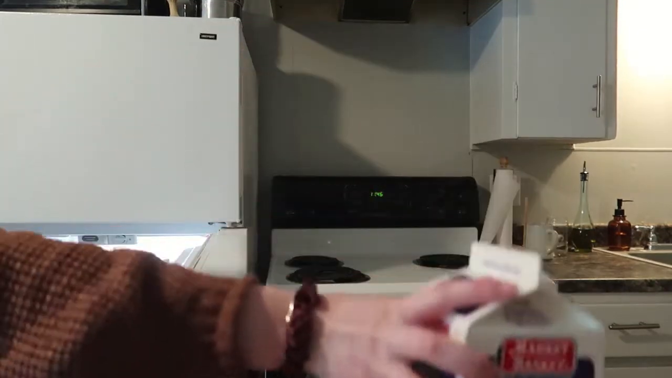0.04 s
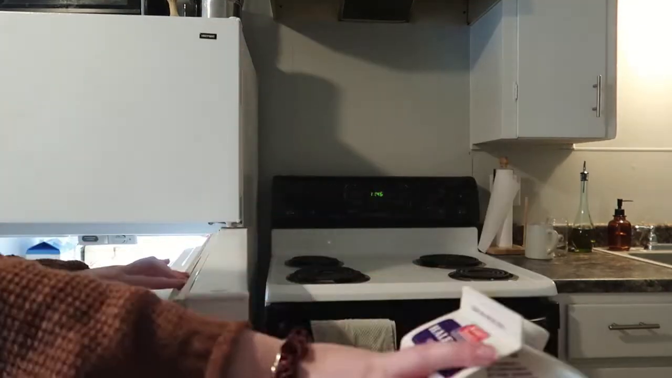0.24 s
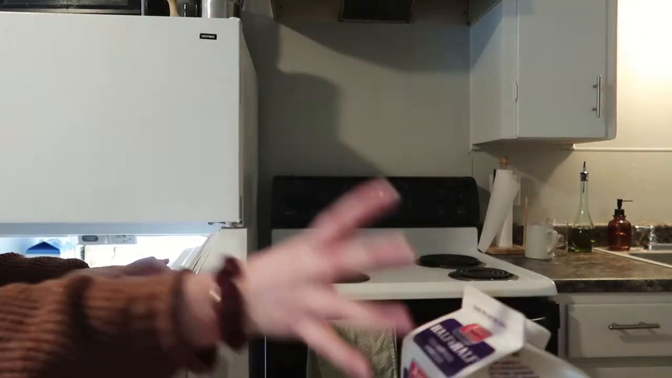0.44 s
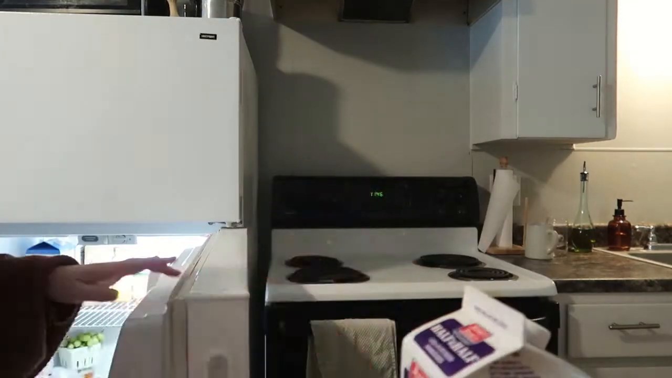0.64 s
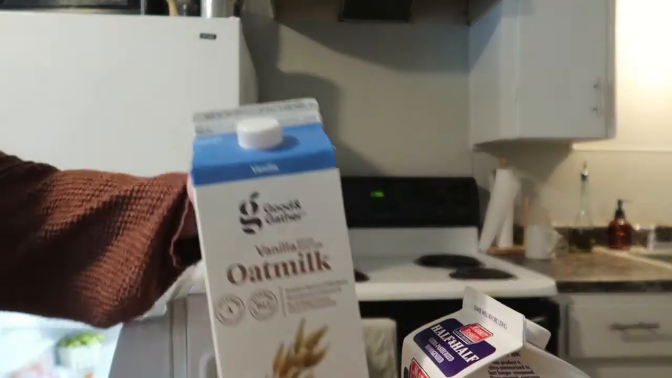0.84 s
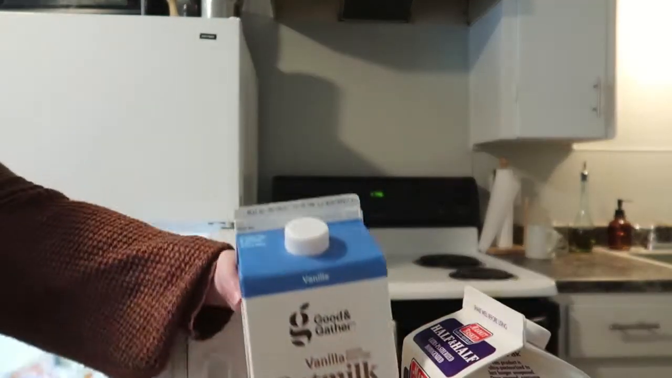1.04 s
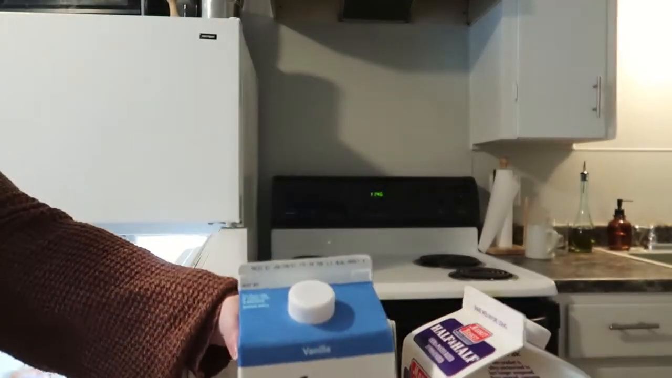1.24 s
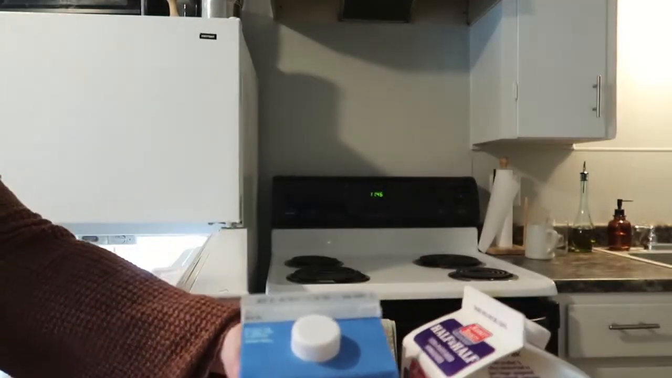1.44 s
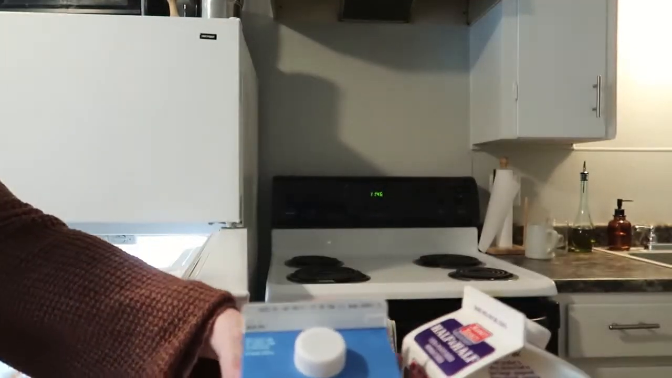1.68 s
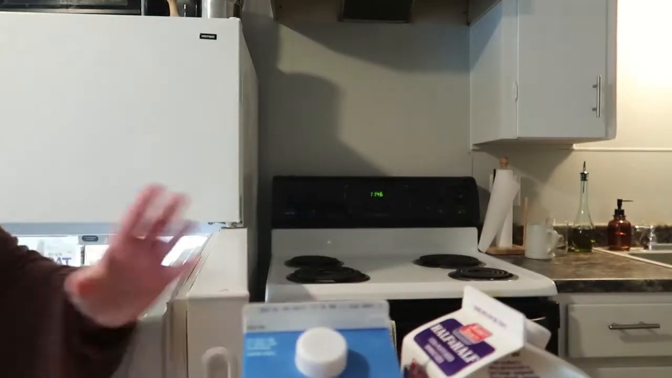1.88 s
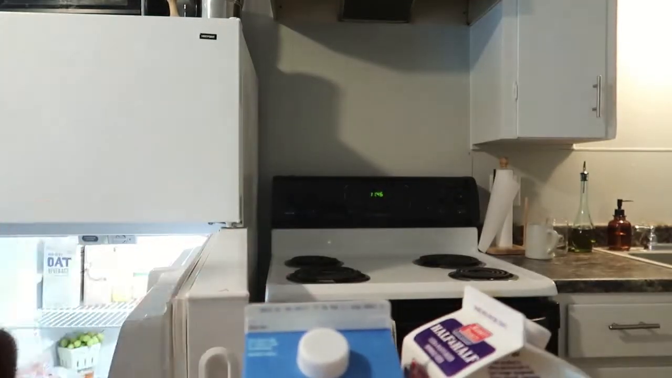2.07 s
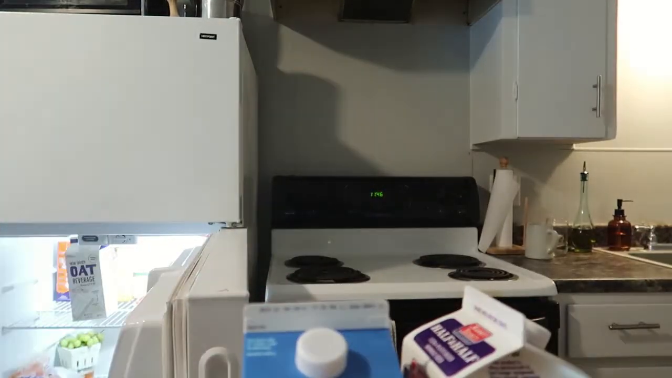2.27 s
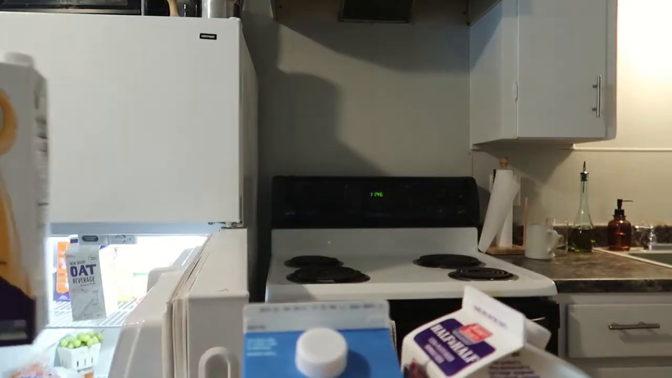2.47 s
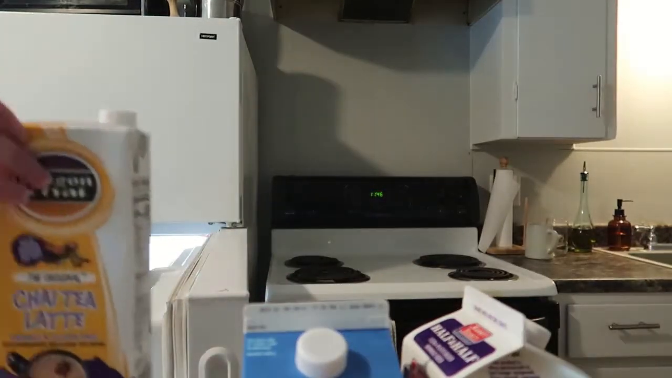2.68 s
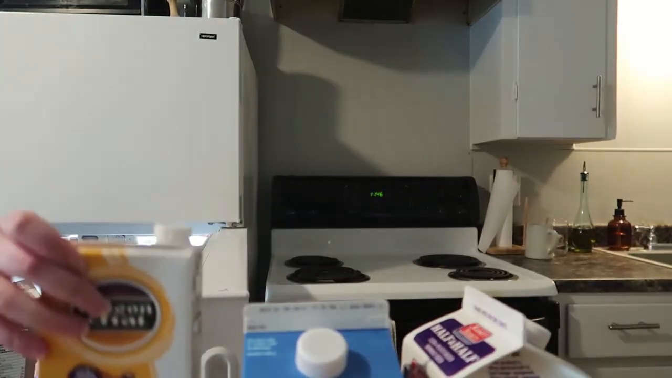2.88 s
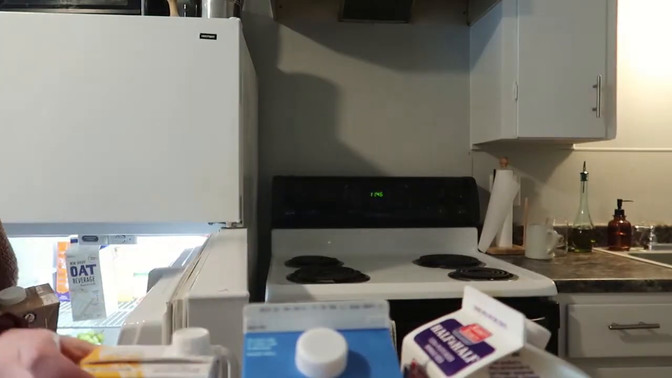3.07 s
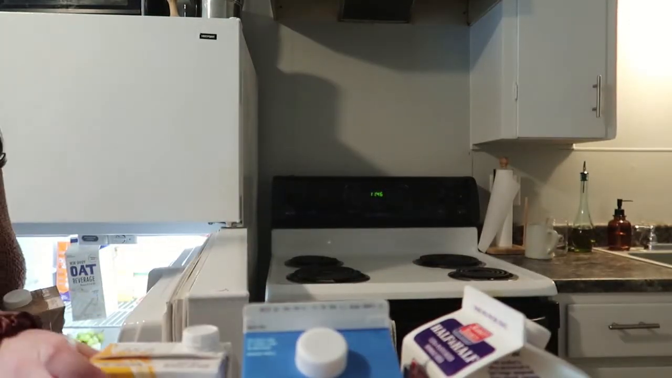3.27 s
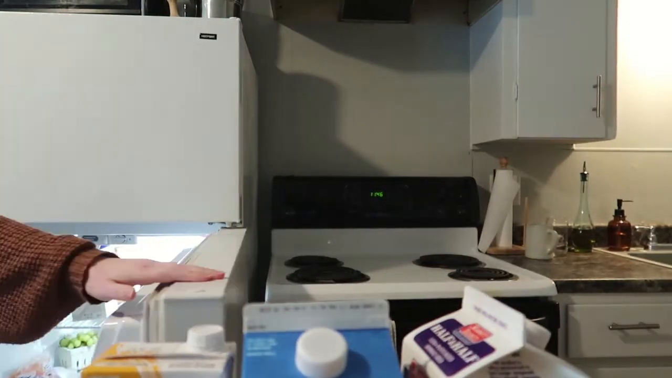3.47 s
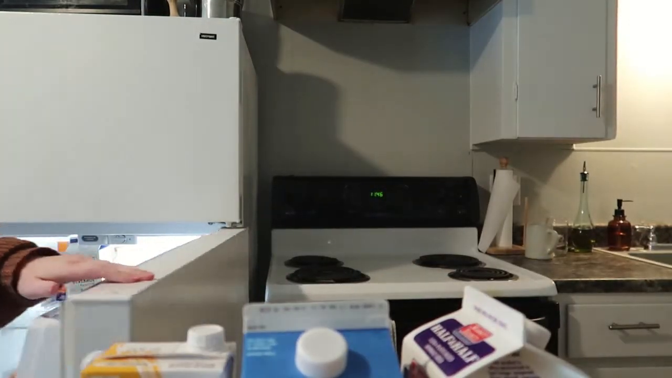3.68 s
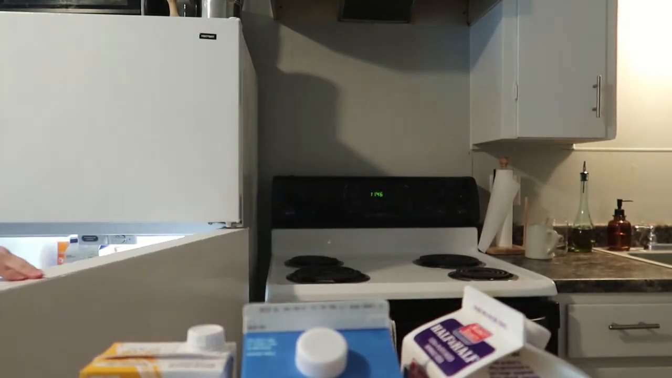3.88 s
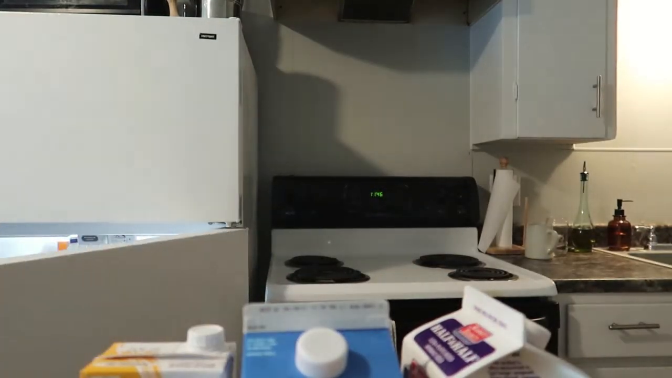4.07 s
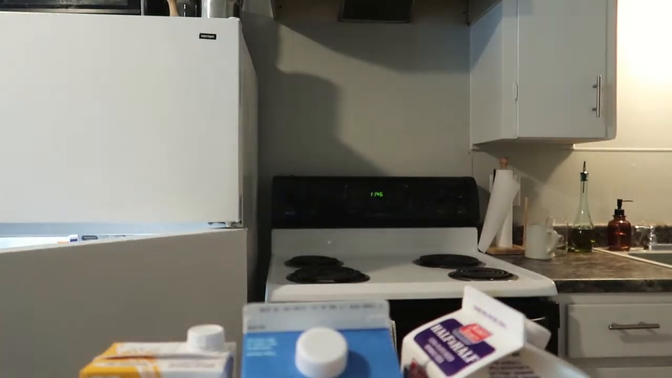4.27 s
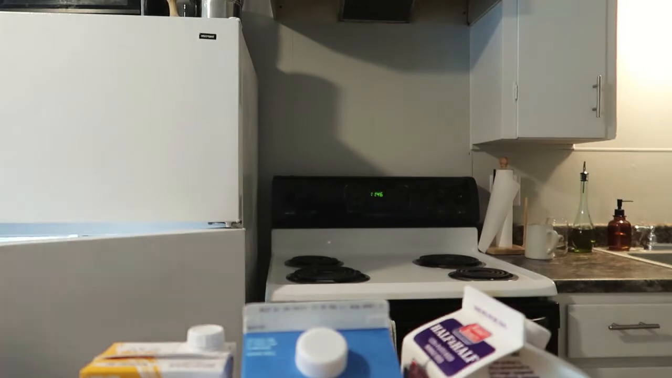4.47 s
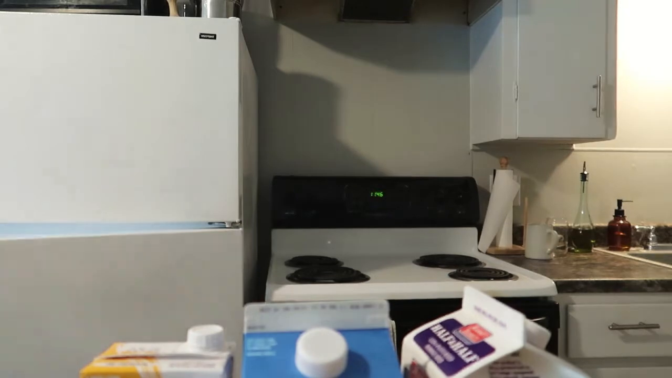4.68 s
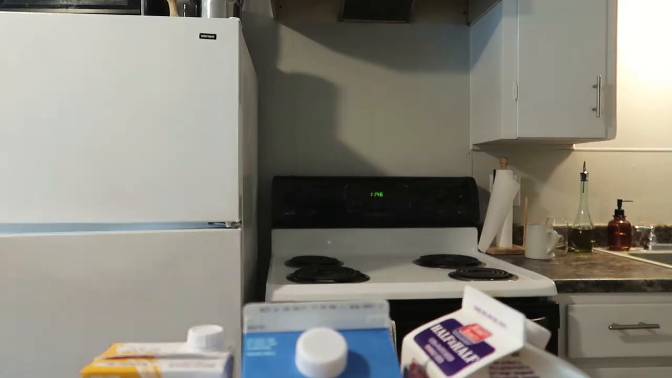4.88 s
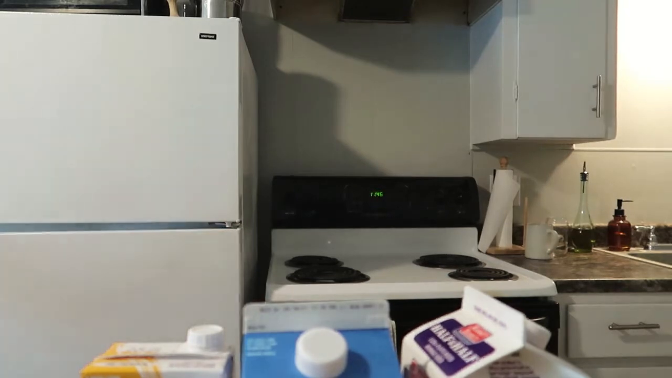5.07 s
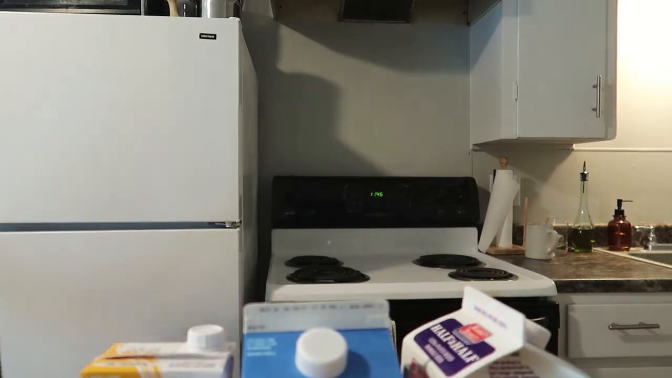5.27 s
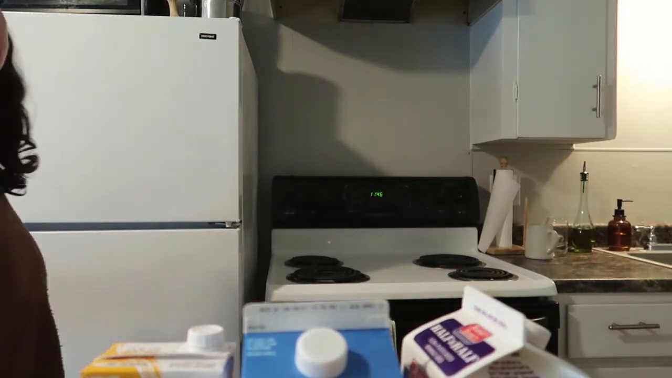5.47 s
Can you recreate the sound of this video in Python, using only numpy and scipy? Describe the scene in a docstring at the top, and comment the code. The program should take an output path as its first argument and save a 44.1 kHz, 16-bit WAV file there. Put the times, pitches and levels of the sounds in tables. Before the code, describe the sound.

A small, slightly reverberant kitchen, heard close to the counter in stereo, with soft low room tone and hiss. At 0.2 s a full carton lands very loudly, a rapid cluster of dull thuds and slaps ringing the counter briefly; the limiter ducks the background, which recovers over more than a second. At 0.4-0.55 s come small knocks, a tiny squeak and papery rubbing, then faint liquid gulps and clicks at 0.6-0.9 s. A second carton bumps down at 1.45 s, rocking and settling, with light taps and a slide at 1.7-1.9 s. It is quiet from 2 s, with a faint deep drone. At 3.16 s a third carton hits harder and brighter, settling by 3.3 s. From 3.5 s the fridge door is pushed with soft scrapes and rattles, low thumps near 3.95 and 4.5 s, and a faint raspy creak. Light knocks at 5.2-5.45 s end it.

```python
"""Three full paper cartons land on a kitchen counter: damped sines give thud and slab ring, filtered noise the slap.
Light taps and clicks ring thin walls by modal sums; sliding board is grainy friction noise; squeaks are sines in hiss.
Liquid gulps through a drifting resonance, and the refrigerator door knocks and rattles as it is pushed and shut.
Low sines make the thumps, drone and compressor hum, over room tone and hiss in a small reverberant kitchen.
The first thud drives the recorder's limiter down for over a second."""
import sys
import numpy as np
from scipy import signal
from scipy.fft import rfft, irfft, next_fast_len
from scipy.io import wavfile
from scipy.ndimage import uniform_filter1d, minimum_filter1d

SR = 44100
rng = np.random.default_rng(int(sys.argv[2]) if len(sys.argv) > 2 else 0)


def persist_wave(psi):
    """Save psi, clipped to +-1, as 16-bit WAV."""
    counts = np.round(np.clip(psi, -1, 1) * 32767).astype(np.int16)
    wavfile.write(sys.argv[1], SR, np.atleast_2d(counts).T)


N = 243873

# a carton lands and rocks, or is tapped with a low thud; hardness runs from flat base 0 to sharp edge 1,
# ring and slap are against the force:
# start_s, force_db, thud_hz, ring_db, hardness_0_to_1, slab_place_0_to_1, slap_db
CARTON_BLOWS = [(.1944, 9, 275.6, -16.5, 0.45, 0.12, -8.5), (0.1982, 7, 225, -17, 0.15, .28, -21.5),
                (0.2022, -1.5, 429, -17.5, 0.05, .36, -20), (.2098, -10.5, 410, -12, .1, 0.1, -7),
                (.2247, -1.5, 356, -3, 0.01, .47, -24), (0.2398, -4, 399, -9, 0.62, 0.31, -10.5),
                (0.2521, -1.5, 314, -8, 0, 0.44, -19), (0.2594, -4.5, 181, -22, 0, 0.27, -25),
                (.279, -9, 251, -21, 0, .1, -24), (0.4011, -22, 476, -3, 0.79, .75, -11),
                (.49, -22.5, 320, -10.5, 0.015, 0.36, -20), (.502, -23.5, 253, 1.5, 0.73, 0.48, -11),
                (.513, -19, 354, -1, 0.32, 0.04, -25), (.545, -15, 174, -18, 0, 0.72, -27),
                (1.157, -23, 205, -2, 0.17, 0.44, -27), (1.172, -36.5, 183, 13.5, 0, 0.2, -23),
                (1.4538, -16, 420, -11, 0.53, 0.38, -5.5), (1.4593, -7, 445, -6, 0.53, .14, -12),
                (1.4693, -7.5, 191, 0, 0, .5, -21), (1.479, -15, 210, -6, 0.25, 0.35, -19),
                (1.485, -21.5, 608, -5, 0, .5, -12), (1.504, -25, 430, -11, .55, 0.19, -9),
                (1.5108, -11, 212, -17.5, 0, .26, -22), (1.5201, -17, 254, -15, 0.019, 0.61, -19),
                (1.5619, -23.5, 217, -7, 0.35, 0.61, -28), (1.799, -26, 256, -7, 0.019, .3, -15),
                (3.159, -14.5, 341, -9.5, 0.92, .43, -5.5), (3.1616, -0.5, 293, -20.5, 0.95, 0.02, -8.5),
                (3.168, -18, 435, -10, .95, 0.51, -3), (3.183, -20.5, 636, -3.5, 0.91, 0.73, -11),
                (3.193, -22, 385, -3, 0.13, 0.2, -15), (3.229, -22.5, 288, 3.5, 0.88, .5, 2),
                (3.235, -12, 313, -2, 1, 0.25, -12.5), (3.2403, -20.5, 641, -3.5, 0.59, .6, -20),
                (3.291, -35, 254, -7, 0.2, 0.28, -12)]
# modes of the counter slab and what stands on it: mode_hz, level_db, t60_s
COUNTER_MODES = [(100.5, -17.5, 0.28), (139.4, -17.5, 0.63), (149.8, -11.5, 0.22), (197.4, 0, 0.18),
                 (229.2, -8, 0.2), (266.7, -1, 0.14), (312, -16, 0.13), (339.4, -15, 0.29),
                 (396.7, 2.5, 0.22), (435, -10.5, 0.056), (464.6, -11.5, 0.33), (513, -5, 0.29),
                 (617, -14.5, 0.34), (631, -8.5, 0.082), (721, -10, 0.16), (872, -5, 0.098)]
# slap spectrum of a gable-top carton: frequency_hz, level_db
GABLE_SLAP = [(150, 0), (500, 7.5), (680, 3), (860, 6.5), (1020, -7.5), (1170, -7.5), (1350, 3), (1750, -8),
              (2150, -3), (2450, -0.5), (2900, -8.5), (3500, -5), (4900, -7.5), (8000, -11), (15000, -18)]
# slap spectrum of the last, brick-shaped carton: frequency_hz, level_db
BRICK_SLAP_SPECTRUM = [(150, 1.5), (450, 4), (720, 5), (880, -6), (1150, -10.5), (1350, 3), (1900, 0),
                       (2170, 2.5), (2750, -7.5), (3200, -9.5), (3600, -16), (4350, -5.5), (5100, -11),
                       (5800, -6), (8500, -10), (15000, -10)]
# light taps and clicks on thin walls (carton, shelf or refrigerator door):
# start_s, level_db, pitch_factor, cutoff_hz, wall_place_0_to_1
LIGHT_TAPS = [(.402, -20.5, 0.97, 2400, 0.87), (0.4544, -23, 0.99, 2780, 0.58),
              (0.7229, -35, 1.13, 9000, 0.84), (.7995, -32, 0.86, 3050, 0.98), (1.6912, -25, 1, 3406, 0.56),
              (1.7156, -32, 1.04, 2925, 0.68), (1.794, -29.5, 1.33, 2880, 0.84),
              (1.7989, -22.5, 1.014, 3450, 0.96), (2.5981, -33, 0.6, 4200, .9),
              (2.8329, -43, 0.74, 3460, 0.66), (3.3563, -33.5, 0.78, 3750, 0.7),
              (3.3956, -23, 1.04, 1900, 0.46), (3.492, -32, 2.06, 13440, 0.87),
              (5.2455, -30, 1.01, 2300, 0.6), (5.3705, -24.5, 1.14, 4200, 0.65)]
# modes of a thin wall, before pitch and damping factors: mode_hz, level_db, t60_s
WALL_MODES = [(410.4, -5.5, .1), (967, -3, 0.089), (1194, 0, 0.033), (1475, -1, 0.027), (1872, 0, 0.047),
              (2477, 0.5, 0.022), (3105, -8.5, .035), (4040, -15, 0.032)]
# paperboard and sleeve slide; wall ring is against the friction:
# start_s, hold_s, t60_s, level_db, high_edge_hz, wall_ring_db
RUB_STROKES = [(.392, 0, 0.49, -37, 2480, -7), (.531, 0.019, 0.34, -31, 4040, -16),
               (.541, 0.0094, 0.18, -39, 9500, -20), (0.723, 0.062, 0.39, -36.5, 2600, -9),
               (.85, 0, 0.31, -54.5, 3440, -10), (1.148, 0.029, 0.61, -51.5, 7330, -2.5),
               (1.4, 0.00061, 0.26, -50, 5100, -10), (1.473, 0.012, 0.41, -48, 5500, -6),
               (1.651, 0.011, 0.52, -47, 3284, -13), (1.862, 0.00064, 0.24, -35, 3600, -5),
               (2.019, 0, .32, -50, 4020, -18.5), (2.17, 0.0034, 0.21, -62, 3420, 2),
               (3.097, 0.062, 0.21, -58, 10900, -17), (3.506, 0.071, 0.44, -45.5, 2400, -11),
               (3.563, 0, 0.22, -49, 8950, -13), (4.921, 0.013, 0.21, -46.5, 587, -13.5),
               (5.031, 0, 0.94, -50.5, 4160, -5)]
# friction spectrum: frequency_hz, level_db
FRICTION = [(100, 27.5), (260, 11), (420, 8.5), (700, 4), (1000, 4.5), (1400, 1), (2200, -0.5),
            (3500, -4.5), (8000, -8), (15000, -31)]
# stick-slip of fingers, board and hinge: start_s, length_s, level_db, pitch_hz, hiss_share_0_to_1, hiss_width_per_pitch
STICK_SLIPS = [(.3837, 0.0075, -24.5, 2110, 0.26, 0.15), (0.545, 0.032, -36.5, 2047, .46, 0.11),
               (1.871, 0.036, -55, 2980, 0.1, .1), (1.877, 0.042, -61.5, 4850, .1, .08),
               (3.568, 0.042, -58.5, 3590, 0.5, .13), (4.321, 0.19, -53.5, 2290, 0.83, 0.14),
               (4.33, 0.27, -61.5, 3670, .97, .2), (4.557, 0.054, -54, 2300, .9, 0.25)]
# liquid shifts in a carried carton: start_s, level_db, pitch_hz
LIQUID_SHIFTS = [(0.634, -32.5, 205), (.745, -32.5, 223), (.745, -32, 492), (.8, -42, 260),
                 (0.931, -38, 219), (2.089, -52, 316)]
# the door is pushed and shut and its shelves rattle; panel and rattle are against the knock:
# start_s, rise_s, level_db, low_edge_hz, high_edge_hz, panel_hz, panel_db, rattle_db, liner_place_0_to_1
DOOR_KNOCKS = [(3.496, 0.0058, -27.5, 264.4, 2270, 954, -6.5, -18.5, 0.08),
               (3.598, 0.0029, -51, 170, 900, 454, 5, -20, .3),
               (3.627, 0.0058, -44.5, 170, 1110, 244, -5, -23, 0.78),
               (3.664, .0072, -48, 400, 1700, 720, -14, -23, .2),
               (3.755, .007, -36, 457, 3160, 2570, -5, -10.5, 0.39),
               (3.828, 0.0077, -40, 201.6, 1050, 460, -2.5, -12.5, 1),
               (3.854, 0.0047, -38, 1000, 3100, 1400, -2, -9.5, 0.16),
               (3.94, 0.019, -38.5, 342, 2130, 1360, -20, -6, 0.74),
               (3.979, 0.0038, -34.5, 394, 1900, 860, -9, -28, 0.45),
               (4.455, 0.014, -36, 202, 1120, 1140, -8.5, -11, 0.3),
               (4.527, 0.0082, -33, 382, 2500, 1780, -6.5, -17.5, 0.83),
               (4.986, 0.0092, -40.5, 200, 6700, 526, -8.5, -13, 0.28),
               (5.178, 0.00203, -41.5, 298, 970, 850, -22, -5.5, .1),
               (5.2443, 0.0011, -35, 1150, 2290, 1250, -0.5, -15.5, 0.95),
               (5.343, .00305, -32, 398, 3700, 1150, -7, -14.5, 0.29),
               (5.356, 0.008, -32, 298, 3500, 545, -5, -14, 0.67),
               (5.369, 0.0028, -37.5, 390, 5200, 2630, -7, -15, .85),
               (5.404, .003, -44.5, 400, 3000, 1390, 4, -14, 0.55),
               (5.473, 0.0099, -43, 450, 2570, 970, -4, -14, 0.17)]
# modes of the door's plastic liner: mode_hz, level_db, t60_s
LINER_MODES = [(283, -2.5, 0.12), (360, -2, 0.21), (521, -1, .1), (962, -21, 0.13), (1209, -5, .16),
               (1580, -7, 0.15), (2040, -2, 0.069), (2360, 0.5, 0.055), (3170, -9, .12)]
# door, cabinet and counter flexing: start_s, level_db, pitch_hz, rise_s
FLEX_THUMPS = [(.205, -24, 46.4, 0.084), (.5, -31.5, 53, 0.028), (1.155, -29, 83.6, 0.015),
               (1.471, -30, 50.5, 0.04), (1.461, -15.5, 149.3, 0.0047), (1.87, -33, 89, 0.0077),
               (3.161, -34.5, 82, 0.0049), (3.263, -20.5, 141, 0.0031), (3.491, -29, 55, 0.0043),
               (3.957, -23.5, 50.1, 0.028), (4.484, -17.5, 51, 0.02), (4.53, -44, 148, 0.007),
               (4.992, -33.5, 48, 0.015), (5.1, -36.5, 49, 0.049), (5.245, -35, 285, 0.002),
               (5.353, -28, 54, 0.0036), (5.361, -33.5, 99, .005), (5.366, -28, 249, 0.003),
               (5.423, -37.5, 246, 0.017)]
# path of the cabinet's drone with the door open, before a common trim: time_s, pitch_hz, level_db
DRONE_PATH = [(2.05, 45.5, -58), (2.192, 44.45, -50.5), (2.81, 45.43, -47.5), (2.958, 48.75, -39),
              (3.372, 48.5, -48), (3.48, 51.7, -44)]
# mean level of the compressor hum: time_s, level_db
HUM_LEVEL = [(0, -64), (3.3, -64.5), (3.6, -54.5), (5.53, -62)]
# reverberation time of the kitchen: frequency_hz, t60_s
KITCHEN_DECAY = [(100, 0.24), (300, 0.46), (1000, 0.15), (3000, 0.32), (10000, 0.17)]
# side against mid for near sounds: frequency_hz, side_to_mid_db
NEAR_WIDTH = [(60, -50), (250, -25), (1000, -18.5), (2200, -14.5), (4000, -6), (9000, 8.5)]
# relative density of room tone and hiss: frequency_hz, density_db_per_hz
AIR_SPECTRUM = [(15, -47), (25, 0.5), (50, -0.5), (80, -13.5), (120, -18.5), (160, -21.5), (205, -15.5),
                (280, -24), (350, -22.5), (530, -27.5), (720, -31), (950, -34), (2360, -35.5), (11500, -55),
                (13800, -72.5), (15500, -86)]
# side against mid for room tone and hiss: frequency_hz, side_to_mid_db
AIR_WIDTH = [(60, -38), (110, -19), (200, -10), (380, -3), (700, -2), (1290, 0.5), (2380, -3), (4400, 2),
             (8120, 0), (15000, 8.5)]

AGE = np.arange(SR) / SR  # seconds since an event began
BRICK_FROM_S = 3
EDGE_THUD_DB = -8  # an edge thuds less than a flat base
RING_FLAT_HZ, RING_EDGE_HZ = 331, 420  # a harder contact is shorter, so it reaches higher modes
SLAP_FLAT_HZ, SLAP_EDGE_HZ = 1147, 3440  # upper edge of the slap
CONTACT_FLAT_S, CONTACT_EDGE_S = 0.0037, 0.0019  # time the slab takes to reach its full ring
RUB_RISE, RUB_LOW_HZ = 0.045, 239  # rise as a share of the decay; low edge
CLUMP_DB, CLUMP_HZ = 2.5, 45  # default depth and fastest rate of uneven friction
# rise and release t60 as shares of the length, wander as a share of the pitch
SQUEAK_RISE, SQUEAK_RELEASE, SQUEAK_WIDTH = 0.082, 6.6, 0.086
SLOSH_RISE_S, SLOSH_T60_S = 0.02, 0.44
SLOSH_WIDTH, SLOSH_DRIFT = 0.18, 0.046  # shares of the pitch
KNOCK_T60_S, KNOCK_STRETCH = 0.12, 1.5  # t60 at zero rise, and what each second of rise adds
PANEL_WIDTH, PANEL_DRIFT = 0.13, 0.064  # shares of the panel's pitch
RATTLE_RISE_S, RATTLE_T60_S = 0.067, 0.65
THUMP_T60_CYCLES = 15.2  # lower thumps ring longer
HUM_HZ = 114.5
AIR_DB = -48.5
CEILING_DB, EDGE_HZ = -0.5, 16000  # limiter ceiling and upper band edge


def blows(base_hz=150, thud_rise=0.0015, thud_t60=0.058, slap_t60=0.029,
          buzz_db=-22, buzz_t60=0.34, chatter_db=4.0, chatter_hz=180):
    """Impact excitation: the carton's weight thuds, the slab rings and the board slaps; hardness sets brightness."""
    out = np.zeros(N)
    for s, force_db, thud_hz, ring_db, hard, place, slap_db in CARTON_BLOWS:
        ring_hz = RING_FLAT_HZ * (RING_EDGE_HZ / RING_FLAT_HZ) ** hard
        slap_hz = SLAP_FLAT_HZ * (SLAP_EDGE_HZ / SLAP_FLAT_HZ) ** hard
        contact_s = CONTACT_FLAT_S * (CONTACT_EDGE_S / CONTACT_FLAT_S) ** hard
        # a small base radiates little bass
        thud = cut(sine(thud_hz) * swell(thud_rise, thud_t60), base_hz, "high")
        ring = np.zeros(SR)
        for k, (hz, db, t60) in enumerate(COUNTER_MODES):
            # place sets each mode's share; a soft contact leaves out the high ones
            share = amp(db) * np.cos(np.pi * k * place) / np.hypot(1, (hz / ring_hz) ** 2)
            ring += share * sine(hz) * fade(t60)
        ring *= np.minimum(AGE / contact_s, 1)
        board = noise(BRICK_SLAP_SPECTRUM if s > BRICK_FROM_S else GABLE_SLAP, SR)
        # the base chatters as it settles
        buzz = amp(buzz_db + chatter_db * np.minimum(wobble(chatter_hz), 2)) * fade(buzz_t60)
        slap = cut(board * (fade(slap_t60) + buzz), slap_hz, "low", order=3)
        # equally loud whether dull or bright
        slap /= cut(board, slap_hz, "low", order=3).std() + 1e-12
        blow = amp(ring_db) * ring + amp(slap_db) * slap - amp(EDGE_THUD_DB * hard) * thud
        add(out, s, amp(force_db) * blow)
    return out


def taps(ring_db=-4, tick_db=-15, tick_t60=0.12, contact_s=0.0009):
    """Modal ringing: a light tap or click excites a thin wall with a faint tick; higher walls die sooner."""
    out = np.zeros(N)
    for s, db, pitch, edge_hz, place in LIGHT_TAPS:
        tick = noise(GABLE_SLAP, SR) * fade(tick_t60 / pitch)
        ring = wall(WALL_MODES, pitch, 1 / pitch, place) * np.minimum(AGE / contact_s, 1)
        add(out, s, amp(db) * cut(amp(ring_db) * ring + amp(tick_db) * tick, edge_hz, "low"))
    return out


def rubs(board_pitch=0.94, board_damping=0.5, board_low_hz=900, stroke_clump_db=1.5):
    """Friction excitation: sliding contacts also ring the carton's walls; slower-dying strokes start more gently."""
    out = np.zeros(N)
    for s, hold, t60, db, high_hz, board_db in RUB_STROKES:
        drive = slips(board_low_hz, high_hz, clump_db=stroke_clump_db)
        response = wall(WALL_MODES, board_pitch, board_damping)
        board = unit(signal.fftconvolve(drive, response)[:SR])
        friction = slips(RUB_LOW_HZ, high_hz, clump_db=stroke_clump_db)
        stroke = swell(RUB_RISE * t60, t60, hold=hold)
        add(out, s, amp(db) * (friction + amp(board_db) * board) * stroke)
    return out


def sloshes():
    """Cavity resonance: a soft gulp in the carton's air pocket drifts in pitch as the liquid moves."""
    out = np.zeros(N)
    for s, db, hz in LIQUID_SHIFTS:
        pitch_hz = hz * (1 + SLOSH_DRIFT * wobble(11))
        gulp = resonate(slips(hz / 2, 2 * hz), pitch_hz, SLOSH_WIDTH * hz)
        add(out, s, amp(db) * gulp * swell(SLOSH_RISE_S, SLOSH_T60_S))
    return out


def squeaks(hiss_below=0.64, hiss_above=3.7, drift=0.016, drift_hz=25):
    """Stick-slip: slips in step make one wandering pitch; those out of step rasp in a wavering band around it."""
    out = np.zeros(N)
    for s, length, db, hz, hiss, hiss_width in STICK_SLIPS:
        width_hz = SQUEAK_WIDTH * hz
        pitch_hz = hz + width_hz / 2 * wobble(width_hz)
        tone = unit(np.sin(2 * np.pi * np.cumsum(pitch_hz) / SR))
        rasp_hz = hz * (1 + drift * wobble(drift_hz))
        rasp = resonate(slips(hiss_below * hz, hiss_above * hz, clump_db=0.0), rasp_hz, hiss_width * hz)
        sound = unit((1 - hiss) * tone + hiss * rasp)
        envelope = swell(SQUEAK_RISE * length, SQUEAK_RELEASE * length, hold=length * (1 - SQUEAK_RISE))
        add(out, s, amp(db) * sound * envelope)
    return out


def door(liner_db=1, sharp_s=0.0019, drift_hz=20, rattle_grain_db=2.5):
    """Contact excitation: pushes scrape a panel and set off a grainy rattle; sharper knocks ring the liner more."""
    out = np.zeros(N)
    for s, rise, db, low_hz, high_hz, panel_hz, panel_db, rattle_db, place in DOOR_KNOCKS:
        push = swell(rise, KNOCK_T60_S + KNOCK_STRETCH * rise)
        shake = amp(rattle_db) * swell(RATTLE_RISE_S, RATTLE_T60_S)
        drifting_hz = panel_hz * (1 + PANEL_DRIFT * wobble(drift_hz))
        panel = resonate(slips(low_hz, high_hz), drifting_hz, PANEL_WIDTH * panel_hz)
        rattle = slips(low_hz, high_hz, grain_db=rattle_grain_db)
        scrape = slips(low_hz, high_hz) * push
        liner = cut(cut(wall(LINER_MODES, place=place), low_hz, "high"), high_hz, "low")
        add(out, s, amp(db) * (scrape + rattle * shake + amp(panel_db) * panel * (push + shake)))
        add(out, s + rise, amp(db + liner_db) * sharp_s / rise * liner)
    return out


def thumps():
    """Flexural resonance: door, cabinet and counter thump as single damped modes, the lower ones for longer."""
    out = np.zeros(N)
    for s, db, hz, rise in FLEX_THUMPS:
        add(out, s, -amp(db) * sine(hz) * swell(rise, THUMP_T60_CYCLES / hz))
    return out


def drone(trim_db=-0.5):
    """Frequency modulation: the cabinet's low drone is one sine whose phase sums a gliding pitch."""
    t = np.arange(N) / SR
    s, hz, db = np.transpose(DRONE_PATH)
    tone = np.sin(2 * np.pi * np.cumsum(np.interp(t, s, hz)) / SR)
    present = uniform_filter1d(((t > s[0]) & (t < s[-1])) * 1., size=2000)
    return np.sqrt(2) * amp(trim_db + np.interp(t, s, db)) * tone * present


def compressor(waver_db=1.5):
    """Amplitude modulation: the compressor's hum holds its pitch and wavers slowly in level."""
    t = np.arange(N) / SR
    waver = unit(cut(rng.standard_normal(N), 1.4, "low"))
    level_db = np.interp(t, *np.transpose(HUM_LEVEL)) + waver_db * waver
    return amp(level_db) * unit(np.sin(2 * np.pi * HUM_HZ * t))


def kitchen(x, build=0.0073):
    """Reverberation: a dense tail of reflections in which each band dies at its own speed."""
    hz, t, z = signal.stft(rng.standard_normal(SR), SR, nperseg=256)
    decay = np.exp(-np.log(1000) * t / read(KITCHEN_DECAY, hz)[:, None])
    tail = signal.istft(z * decay, SR, nperseg=256)[1][:SR]
    tail *= np.minimum(AGE / build, 1) ** 2
    return signal.fftconvolve(x, tail / np.linalg.norm(tail))[:N]


def spread(x, t60=0.012):
    """Decorrelation: nearby surfaces make the two microphones differ, mostly in the treble."""
    early = rng.standard_normal(SR) * swell(0.0011, t60)
    return colour(signal.fftconvolve(x, early / np.linalg.norm(early))[:N], NEAR_WIDTH)


def air(rumble_hz=70):
    """Stationary noise: room tone and microphone hiss as independent mid and side."""
    mid, side = (amp(AIR_DB) * unit(cut(noise(AIR_SPECTRUM, N), rumble_hz, "high")) for _ in range(2))
    return mid, colour(side, AIR_WIDTH)


def wall(modes, pitch=1, damping=1, place=0):
    """Modal superposition: the place struck sets each mode's share, damping scales its ring time."""
    ring = np.zeros(SR)
    for k, (hz, db, t60) in enumerate(modes):
        ring += amp(db) * np.cos(np.pi * k * place) * sine(hz * pitch) * fade(t60 * damping)
    return ring


def slips(low_hz, high_hz, clump_db=CLUMP_DB, grain_db=1.5, grain_hz=260):
    """Friction noise: tiny contacts in grains and uneven clumps between two band edges, at rms 1."""
    grain_level = grain_db * np.minimum(wobble(grain_hz), 2)
    clump_level = clump_db * np.minimum(wobble(CLUMP_HZ), 2)
    contacts = noise(FRICTION, SR) * amp(grain_level + clump_level)
    return unit(cut(cut(contacts, low_hz, "high"), high_hz, "low", order=3))


def resonate(x, hz, width_hz):
    """Time-varying resonance: a one-pole filter in a frame rotating along the curve hz; rms 1."""
    turn = np.exp(2j * np.pi * np.cumsum(hz) / SR)
    r = np.exp(-np.pi * width_hz / SR)
    return unit((turn * signal.lfilter([1 - r], [1, -r], x / turn)).real)


def wobble(hz):
    """Band-limited random modulation: a wander of rms 1, low-passed at hz."""
    return unit(cut(rng.standard_normal(SR), hz, "low"))


def sine(hz):
    """Simple harmonic motion starting from zero displacement."""
    return np.sin(2 * np.pi * hz * AGE)


def fade(t60):
    """Exponential damping: 60 dB of decay in t60 seconds."""
    return np.exp(-np.log(1000) * AGE / t60)


def swell(rise, t60, hold=0):
    """Build-up and damping: a smooth rise, a hold, then exponential decay."""
    attack = np.sin(np.pi / 2 * np.minimum(AGE / rise, 1)) ** 2
    return attack * np.exp(-np.log(1000) * np.maximum(AGE - rise - hold, 0) / t60)


def noise(points, size):
    """Spectral shaping of white noise, scaled to rms 1."""
    return unit(colour(rng.standard_normal(size), points))


def colour(x, points):
    """Linear filtering: multiplies the Fourier spectrum by a curve in dB."""
    size = next_fast_len(len(x))
    gain = amp(read(points, np.fft.rfftfreq(size, 1 / SR)))
    return irfft(rfft(x, size) * gain, size)[:len(x)]


def cut(x, hz, kind, order=2):
    """Butterworth low-pass or high-pass filtering."""
    return signal.sosfilt(signal.butter(order, min(hz, SR / 2 - 1000), kind, fs=SR, output="sos"), x)


def read(points, hz):
    """Interpolation of a curve by straight lines over log frequency."""
    f, value = np.transpose(points)
    return np.interp(np.log(hz + 1), np.log(f + 1), value)


def amp(db):
    """Decibel law: level to amplitude gain."""
    return 10 ** (np.asarray(db) / 20)


def unit(x):
    """Normalisation to an rms of 1."""
    return x / np.sqrt(np.mean(x ** 2) + 1e-20)


def add(mix, s, sound):
    """Superposition: mixes a sound in place from time s."""
    part = mix[max(round(s * SR), 0):][:len(sound)]
    part += sound[:len(part)]


def scene(blow_room_db=-17, tap_room_db=-14, rub_room_db=-11, door_room_db=-9):
    """Superposition of near sounds, their reflections, the refrigerator and the room tone, as left and right."""
    heavy, light, sliding, knocking = blows(), taps(), rubs() + sloshes(), door()
    to_room = amp(blow_room_db) * heavy + amp(tap_room_db) * light
    to_room += amp(rub_room_db) * sliding + amp(door_room_db) * knocking
    refrigerator = thumps() + drone() + compressor()
    near = heavy + light + sliding + knocking + squeaks() + kitchen(to_room) + refrigerator
    air_mid, air_side = air()
    mid, side = near + air_mid, spread(near) + air_side
    return np.array([mid + side, mid - side])


def record(dry, recover_db_per_s=4.5):
    """Peak limiting: gain falls within milliseconds and recovers slowly; a low-pass then limits the band."""
    peak_db = 20 * np.log10(abs(dry).max(0) + 1e-9)
    recovery = recover_db_per_s * np.arange(N) / SR
    # each peak is held, falling at the recovery rate
    held_db = np.maximum.accumulate(peak_db + recovery) - recovery
    over_db = np.maximum(held_db - CEILING_DB, 0)
    gain = uniform_filter1d(minimum_filter1d(amp(-over_db), size=441), size=441)
    band = signal.firwin(511, EDGE_HZ, window=("kaiser", 9), fs=SR)
    return signal.oaconvolve(dry * gain, band[None], "same")


dry = scene()
out = record(dry)
persist_wave(out)
```